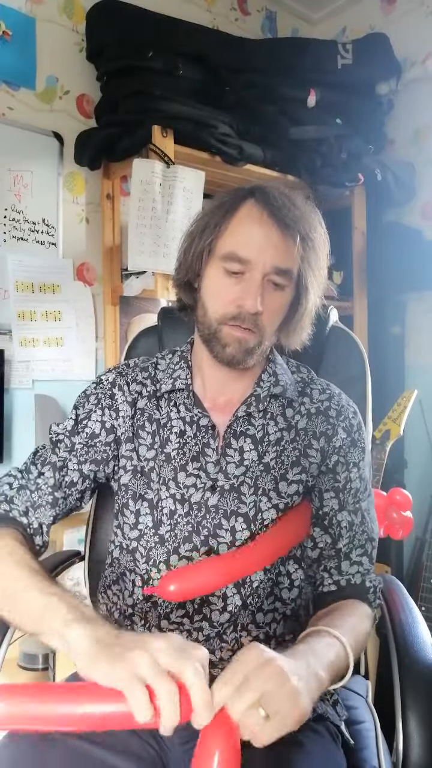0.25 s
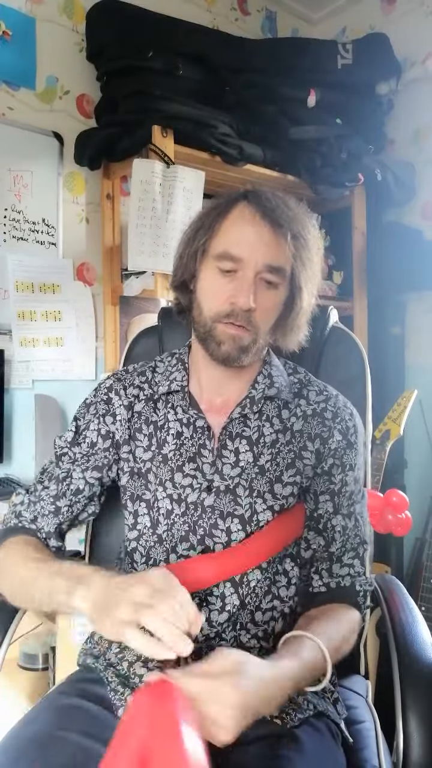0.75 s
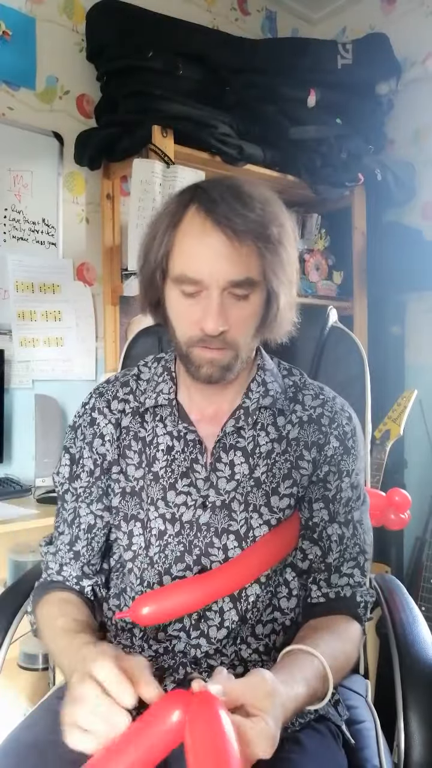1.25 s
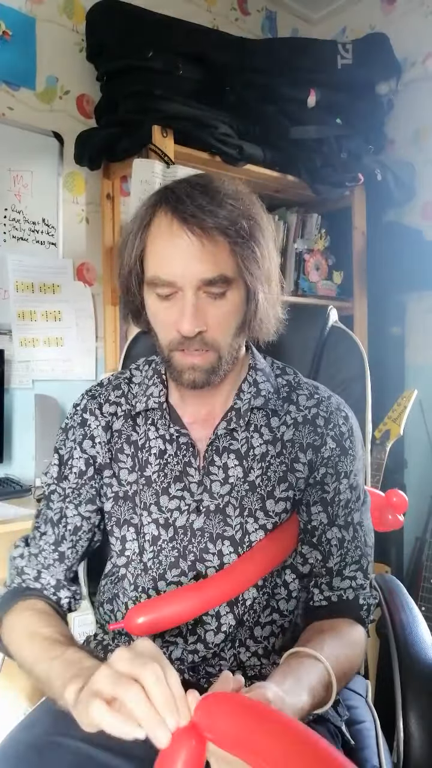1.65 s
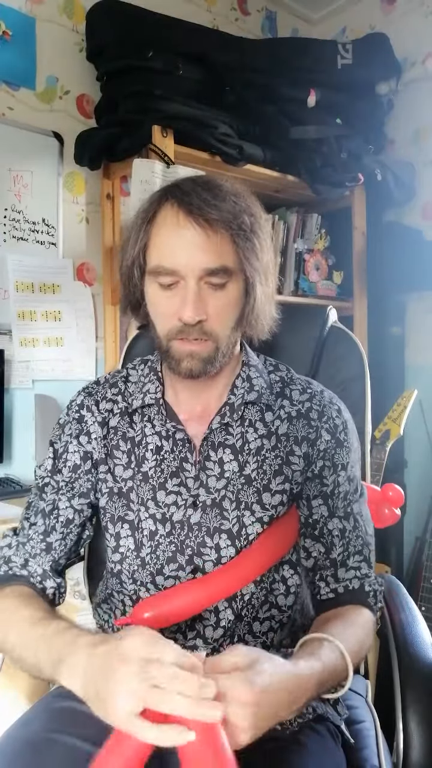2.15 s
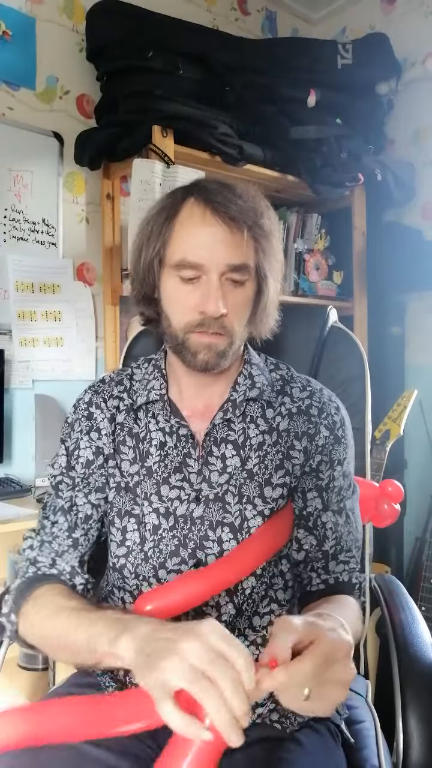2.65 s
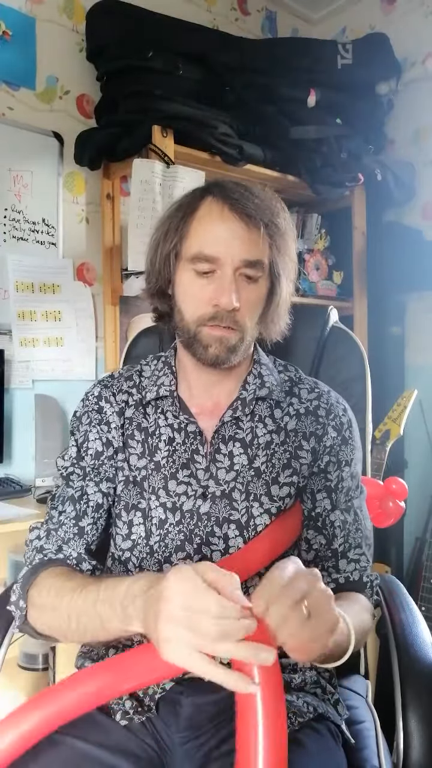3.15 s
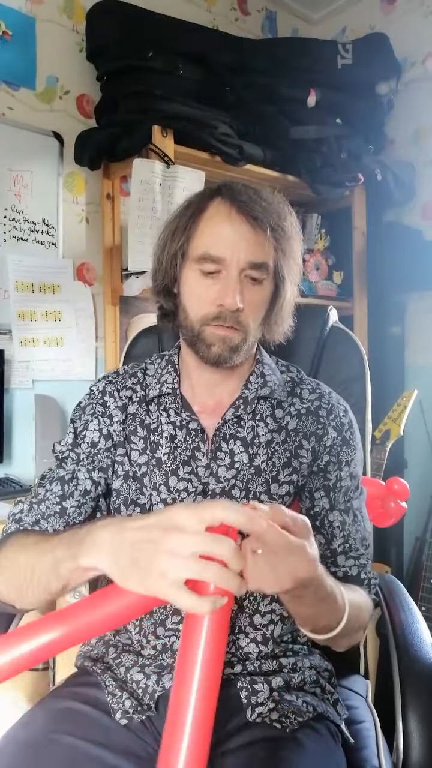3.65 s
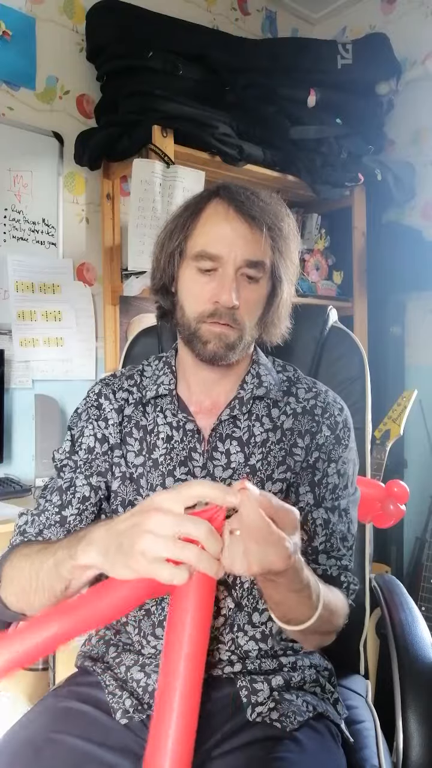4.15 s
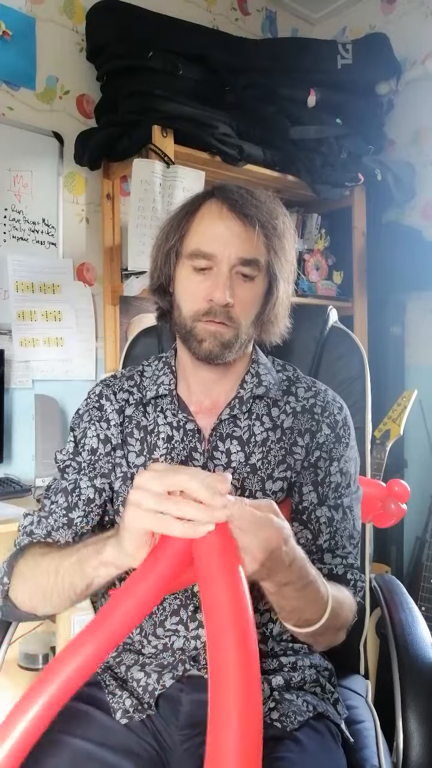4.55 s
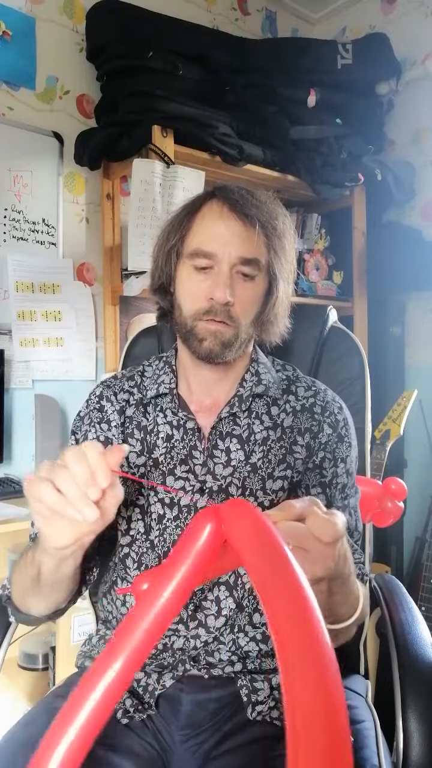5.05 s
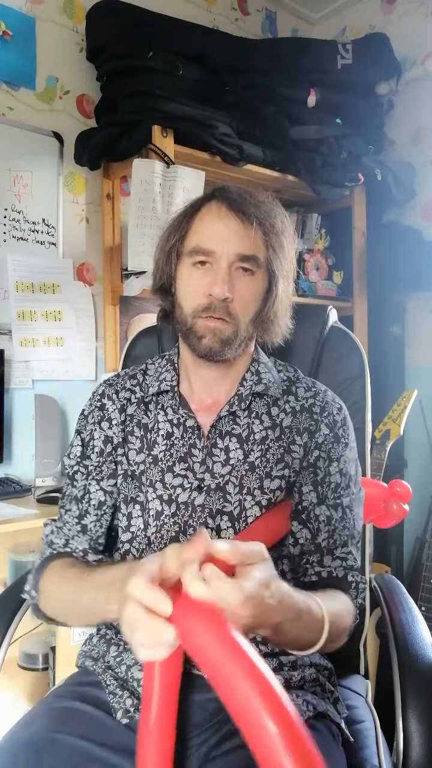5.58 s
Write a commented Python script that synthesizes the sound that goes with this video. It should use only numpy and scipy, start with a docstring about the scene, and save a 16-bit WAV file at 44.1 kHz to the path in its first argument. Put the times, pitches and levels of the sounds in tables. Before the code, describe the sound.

A long rubber balloon is tied off by hand, with irregular snaps, short creaks, rubbing and soft hollow bumps in a quiet room.

```python
"""A small, quiet room, a phone microphone about a metre from hands tying off a long latex balloon.
Rubber sticks and slips under the fingers: single snaps, short dragged creaks, rubbing and thin squeaks.
Soft bumps sound the hollow tube, released skin twangs, and the sharpest plucks leave a clear ring.
Each slip runs along the tube and dies away in its skin and in the room.
Between the snaps, cloth rustles faintly over the room tone."""
import sys
import numpy as np
from scipy import signal
from scipy.fft import rfft, irfft
from scipy.io import wavfile

SR = 44100
rng = np.random.default_rng(int(sys.argv[2]) if len(sys.argv) > 2 else 0)


def dump(signal):
    """Clip the signal to [-1, 1] and save it as 16-bit WAV at the path in sys.argv[1]."""
    limited = np.clip(np.atleast_2d(signal).T, -1, 1)
    pcm = np.round(limited * 32767).astype(np.int16)
    wavfile.write(sys.argv[1], SR, pcm)


N = 256662
SIZE = 32768  # samples in one touch and its decay
AGE = np.arange(SIZE) / SR
FREQ = np.maximum(np.fft.rfftfreq(SIZE, 1 / SR), 1)


def slips():
    """Rubber jumps from under a finger and rings the patch that was pinched."""
    # Each row: start in seconds, drag length in seconds, spectral level in dB, bass weight in dB,
    # the patch's resonance in Hz, its strength in dB.
    releases = [(0.026, 0.0086, 9, 0, 1220, 14), (0.055, 0.0021, 4.5, -4, 3340, 12),
                (.2809, 0, -13, 5.5, 5500, 14), (0.3306, 0.0028, 7.5, 1, 2140, 8),
                (0.365, 0.0082, 2.5, -1, 2300, -12.5), (0.428, 0.032, 11.5, 0.5, 1560, 7.5),
                (0.6175, 0.00018, 2, 9.5, 3650, 8.5), (0.699, 0.0056, 9, -11.5, 2750, 7),
                (0.7073, 0.013, 4, 0.5, 3300, 11), (0.7364, 0.0027, 1, 27, 1270, 14.5),
                (0.9374, 0.0022, 6.5, 12, 420, 9), (1.0973, 0.0024, -4, 0, 2510, 3.5),
                (1.219, 0, -2, 11, 150, 15.5), (1.479, .0064, -12.5, 9.5, 3900, 17),
                (1.612, 0, -27, -13, 3170, 16.5), (1.7024, 0, -9, -3, 4020, 20.5),
                (2.001, 0.0002, -2, 7, 5100, 14), (2.2356, .005, 2, 5, 2000, -8),
                (2.264, 0.0078, 5, -3.5, 2920, 5.5), (2.352, 0.012, 8.5, -15, 1760, 6),
                (2.721, 0.0032, 9, -4, 780, 24), (2.727, 0.0038, 1.5, -6, 1120, 25),
                (2.819, 0.002, -11.5, -4, 1000, 4), (2.869, 0.02, 16.5, -4.5, 460, 10.5),
                (2.93, 0.016, 1, 12, 3000, 13), (2.955, 0.0079, 4.5, 1.5, 1010, 5.5),
                (3.0101, 0.0033, 11, -6, 920, -11), (3.151, 0.0096, 7.5, 6, 2250, 11.5),
                (3.153, .0048, 17.5, -4, 361.5, 15.5), (3.184, 0.0081, 8, 4.5, 2980, 13.5),
                (3.202, 0.019, 12, -6.5, 329, 11), (3.253, 0.019, 6.5, 4, 2760, 6.5),
                (3.478, 0.01, -4, 0, 1710, 10), (3.506, 0.0023, 3.5, 0, 1350, 11.5),
                (3.5416, .015, 18, -1, 1500, 10.5), (3.719, 0.013, -3.5, -5, 1660, 6.5),
                (3.7334, .0069, 5, -20.5, 1280, 6.5), (3.838, 0.014, -3, -8.5, 5460, 10),
                (3.8722, 0.0021, -5.5, 9, 2640, 11), (4.187, 0, 15.5, -15.5, 820, 14.5),
                (4.19, 0.0014, 10, -14.5, 2550, 13.5), (4.4454, 0.0012, 0, -8.5, 2100, 17.5),
                (4.452, 0, 2, -2, 2400, 12.5), (4.482, 0.0016, -7, 1.5, 857, 9),
                (4.5505, 0, 11, -2.5, 2840, 11), (4.6423, 0.0047, -12.5, 8.5, 1430, 11),
                (4.812, 0.0057, -5, 4, 1466, 10), (4.8737, .0018, 7.5, -7.5, 1070, 5.5),
                (4.9828, 0.0041, 15, 6.5, 2420, 6.5), (5.5797, 0.021, -1.5, 6.5, 133, 7.5),
                (5.6127, 0.0044, 6.5, -6, 1960, 6.5), (5.69, 0.0093, -15, 12, 830, 13.5)]
    # Broad spectrum of a slip. Each row: frequency in Hz, relative level in dB.
    slope = [(140, -0.5), (200, -6), (280, -5), (450, -4), (630, -4.5), (820, -1.5), (1600, -3), (2500, -3),
             (4000, -8.5), (6500, -16)]
    out = np.zeros(N)
    for start, drag_s, db, bass_db, patch_hz, patch_db in releases:
        spectrum_db = db + skin_spectrum(slope, bass_db) + resonance(patch_hz, patch_db)
        add(out, start, colour(radiate(release(drag_s)), spectrum_db))
    return out


def release(drag_s, equal_energy_s=0.0056):
    """A snap, then a creak of further catches; the longer the drag, the more energy is in the creak."""
    creak = catches(per_second=1400, scatter_db=5.0) * (AGE < drag_s)
    force = unit(creak) * np.sqrt(drag_s / equal_energy_s)
    force[0] += 1  # the snap
    return force


def catches(per_second, scatter_db):
    """Tiny releases of friction at random moments and of uneven size."""
    caught = rng.random(SIZE) < per_second / SR
    strength = undb(scatter_db * rng.standard_normal(SIZE))
    return caught * strength * rng.choice([-1, 1], SIZE)


def skin_spectrum(points, bass_db, bass_hz=880, cut_hz=82):
    """Spectrum of a touch in dB: a broad slope, the weight of the grip and the tube's hollow note."""
    hz, db = np.transpose(points)
    slope = np.interp(np.log(FREQ), np.log(hz), db)
    weight = bass_db / (1 + (FREQ / bass_hz) ** 2)  # a fuller grip moves the tube in the bass
    hollow_note = resonance(ring_hz=375, strength_db=8, q=5.05)
    bass_loss = 10 * np.log10(1 + (cut_hz / np.maximum(FREQ, 20)) ** 8)  # a thin tube has no deep bass
    return slope + weight + hollow_note - bass_loss


def resonance(ring_hz, strength_db, q=5.0, damping_hz=2600):
    """One peak in dB; rubber damps fast vibration more, so high peaks are broader and weaker."""
    sharpness = q / (1 + ring_hz / damping_hz)
    peak = undb(strength_db) ** 2 * sharpness / q
    detuning = sharpness * (FREQ / ring_hz - ring_hz / FREQ)
    return 10 * np.log10(1 + peak / (1 + detuning ** 2))


def radiate(force, smear_t60_s=0.0017, build_s=0.0053, echo_s=0.0026, room_mode_hz=116.3):
    """The way to the microphone: direct sound, tube echo, scatter in the skin, room; new for each grip."""
    direct, echo, skin, room = rng.standard_normal((4, SIZE))
    build_up = 1 - np.exp(-AGE / build_s)
    echo_lag = int(echo_s * SR * (1 + 0.2 * rng.uniform(-1.1, 1)))
    response = unit(direct * fade(smear_t60_s))  # waves in rubber disperse, so even a snap is smeared
    response += undb(-1) * np.roll(unit(echo * fade(2 * smear_t60_s)), echo_lag)
    response += undb(0.5) * unit(skin * build_up * fade(t60_s=0.11))
    response += undb(-3.5) * unit(room * build_up * fade(t60_s=0.23))
    response += undb(-24.5) * unit(np.sin(2 * np.pi * room_mode_hz * AGE) * fade(t60_s=0.16))
    return signal.fftconvolve(force, response)[:SIZE]


def thumps(dull_db_per_octave=18.5):
    """Soft fingers bump the hollow tube; the softer the contact, the lower its band ends."""
    # Each row: start in seconds, contact in seconds, spectral level in dB, top of the band in Hz.
    bumps = [(.264, 0.0027, 10.5, 1430), (.9352, 0.0021, 17.5, 750), (1.0956, 0.0049, 15.5, 900),
             (1.1888, .028, 19.5, 700), (1.431, 0.0075, -7, 1100), (1.912, 0.0067, 5.5, 1250),
             (2.146, 0.0081, 2.5, 860), (2.383, 0.0099, 9, 1000), (2.461, 0.0042, 2, 850),
             (3.2973, 0.0065, 18, 520), (3.576, 0.0021, 17, 650), (3.93, 0, 18, 460),
             (4.364, .004, 17.5, 520), (5.808, 0.0011, 9, 600)]
    # Broad spectrum of a thump before its dulling. Each row: frequency in Hz, relative level in dB.
    slope = [(100, -1.5), (155, 3.5), (205, -5.5), (280, -5), (450, -9.5), (800, -7.5), (2000, -9),
             (6500, 0.5)]
    out = np.zeros(N)
    for start, contact_s, db, top_hz in bumps:
        knock = resonance(top_hz, strength_db=1.5)  # the touched skin resonates at the top of the band
        octaves_above = np.log2(1 + (FREQ / top_hz) ** 4) / 4
        spectrum_db = db + skin_spectrum(slope, bass_db=0) + knock - dull_db_per_octave * octaves_above
        add(out, start, colour(radiate(release(contact_s)), spectrum_db))
    return out


def rubs_and_rustle(judder_hz=45, judder_db=3.5):
    """Fingers rub the balloon and cloth rustles faintly: dense small catches swell, judder and ebb."""
    # Each row: start in seconds, length in seconds, spectral level in dB, bass weight in dB.
    strokes = [(0, 0.011, -5, 5), (.23, 0.05, -36, 35), (0.267, .064, -4.5, 11), (.351, 0.084, -7.5, 21),
               (0.466, 0.082, -7, 10), (0.53, 0.28, 2, -1), (0.771, 0.25, -1, 12), (1.013, 0.095, -16, 29),
               (1.105, 0.068, -0.5, 5.5), (1.188, 0.055, 4.5, 5.5), (1.287, 0.14, -16, 7),
               (1.504, 0.43, -16.5, 3.5), (1.965, 0.02, -17, 13), (2.062, 0.31, -25, 5),
               (2.219, 0.017, -18, 4), (2.286, 0.064, -1.5, 9.5), (2.391, 0.055, -11.5, 14),
               (2.495, 0.54, -8, -15.5), (2.849, 0.035, 10.5, -12), (3.227, 0.031, 2, 0.5),
               (3.443, 0.033, -25.5, 18), (3.612, .13, -19, 8.5), (3.895, .11, -19.5, 2),
               (4.068, 0.041, -7.5, -13), (4.157, 0.031, -13, -0.5), (4.315, 0.056, -1.5, 1),
               (4.379, 0.066, 0, -2), (4.829, .039, -9.5, 7.5), (5.542, 0.034, -24, 14),
               (5.638, 0.051, -8, 7.5), (5.725, 0.11, -6, 6.5)]
    # Broad spectrum of a rub or rustle. Each row: frequency in Hz, relative level in dB.
    slope = [(130, 1), (200, -8.5), (290, -5), (500, -4), (800, -7), (2000, -3), (4000, -8.5),
             (6500, -13.5)]
    out = np.zeros(N)
    for start, length, db, bass_db in strokes:
        pressure = np.sqrt(np.abs(np.sin(np.pi * AGE / length))) * (AGE < length)
        judder = undb(judder_db * wander(judder_hz))
        force = catches(per_second=1800, scatter_db=4.0) * pressure * judder
        add(out, start, colour(radiate(force), db + skin_spectrum(slope, bass_db)))
    return out


def twangs(sharp_share=0.33, sag_s=0.015, rise_s=0.0077, decay_cycles=32):
    """Released skin swings in one mode whose pitch sags as it slackens; higher notes die sooner."""
    # Each row: start in seconds, final pitch in Hz, level in dB.
    notes = [(.745, 350, -16.5), (.94, 319, -18), (1.097, 282, -32), (2.722, 1040, -16),
             (3.157, 329, -22.5), (3.931, 287, -33), (4.368, 277, -25.5), (4.985, 580, -13),
             (4.993, 321.4, -30), (5.809, 292, -25)]
    out = np.zeros(N)
    for start, final_hz, db in notes:
        hz = final_hz * (1 + sharp_share * np.exp(-AGE / sag_s))
        swing = np.sin(2 * np.pi * np.cumsum(hz) / SR)
        envelope = (1 - np.exp(-AGE / rise_s)) * fade(decay_cycles / final_hz)
        add(out, start, undb(db) * swing * envelope)
    return out


def squeaks(jitter=0.069, wobble_hz=480, spread_hz=2200, harmonics=4):
    """Stick-slip locks briefly to a rough, wavering pitch; a tighter grip brightens higher harmonics."""
    # Each row: start in seconds, length in seconds, pitch in Hz, glide as a share of the pitch,
    # level in dB, brightest frequency in Hz.
    grips = [(.787, .02, 1830, .09, -38, 2500), (.884, .02, 1600, .1, -35, 2600),
             (1.04, .028, 1900, .08, -54, 4600), (1.724, .018, 1640, -.09, -34.5, 4200)]
    out = np.zeros(N)
    for start, length, hz, glide, db, bright_hz in grips:
        progress = np.minimum(AGE / length, 1)
        pitch = hz * (1 + glide * (progress - 0.5) + jitter * wander(wobble_hz))
        phase = 2 * np.pi * np.cumsum(pitch) / SR
        tone = sum(np.sin(k * phase) / (1 + ((k * hz - bright_hz) / spread_hz) ** 2)
                   for k in range(1, harmonics + 1))
        force = tone * np.sqrt(np.abs(np.sin(np.pi * progress)))
        add(out, start, unit(radiate(force)) * undb(db) * np.sqrt(length * SR))
    return out


def rings():
    """A few thin modes sing on after a sharp pluck."""
    # Each row: start in seconds, level in dB.
    plucks = [(0.9394, -46), (3.0109, -40), (4.9827, -40.5)]
    # Each row: frequency in Hz, relative level in dB, seconds to fall by 60 dB.
    modes = [(943, 3, 0.5), (910, -12, 0.21), (1930, 6, .15), (3970, -10.5, 0.19), (5260, -14, .12)]
    ring = sum(undb(db) * fade(t60_s) * np.sin(2 * np.pi * hz * AGE) for hz, db, t60_s in modes)
    out = np.zeros(N)
    for start, db in plucks:
        add(out, start, undb(db) * ring)
    return out


def room_tone(rms_db=-70):
    """Faint steady noise of the room around the microphone."""
    # Each row: frequency in Hz, relative noise density in dB.
    noise_floor = [(15, -46.5), (25, -3), (202, -6), (426, -12.5), (458, 1), (504, -15), (1060, -18),
                   (1320, -13), (1420, -20), (7800, -37.5), (10100, -69), (17200, -120)]
    hz, db = np.transpose(noise_floor)
    gain = undb(np.interp(np.log(np.fft.rfftfreq(N, 1 / SR) + 1), np.log(hz), db))
    noise = irfft(rfft(rng.standard_normal(N)) * gain, N)
    return unit(noise) * np.sqrt(N) * undb(rms_db)


def colour(x, spectrum_db):
    """Causal equaliser that gives x a broad spectrum and leaves its fine ripple."""
    spectrum = rfft(x, SIZE)
    energy_below = np.cumsum(np.abs(spectrum) ** 2)
    half_band_hz = 0.13 * FREQ + 30
    low, high = np.maximum(FREQ - half_band_hz, 1), np.minimum(FREQ + half_band_hz, SR / 2)
    band_energy = np.interp(high, FREQ, energy_below) - np.interp(low, FREQ, energy_below)
    power = band_energy / (high - low) * SR / SIZE
    cepstrum = irfft(np.log(undb(spectrum_db) / np.sqrt(power + 1e-18)))
    cepstrum[0] /= 2
    minimum_phase_gain = np.exp(rfft(2 * cepstrum[:SIZE // 2], SIZE))
    return irfft(spectrum * minimum_phase_gain)


def wander(hz):
    """Random wavering, mostly slower than hz, with a standard deviation of one."""
    drift = signal.sosfilt(signal.butter(2, hz, fs=SR, output="sos"), rng.standard_normal(SIZE))
    return drift / drift.std()


def fade(t60_s):
    """Exponential decay that loses 60 dB in t60_s."""
    return np.exp(-np.log(1000) * AGE / t60_s)


def undb(db):
    """Decibels to gain."""
    return 10 ** (np.asarray(db) / 20)


def unit(x):
    """Scale to an energy of one."""
    return x / np.sqrt(np.sum(x ** 2) + 1e-18)


def add(out, start_s, x):
    """Mix x into out from start_s on."""
    i = max(0, int(start_s * SR))
    out[i:i + len(x)] += x[:max(0, N - i)]


def scene():
    """All the handling over the quiet room, in one channel."""
    return (slips() + thumps() + rubs_and_rustle() + squeaks() + twangs() + rings() + room_tone())[None]


def record(dry, top_hz=7300):
    """The phone keeps only the band under its steep cut-off."""
    return signal.sosfilt(signal.ellip(9, 0.3, 65, top_hz, fs=SR, output="sos"), dry)


dry = scene()
out = record(dry)
dump(out)
```